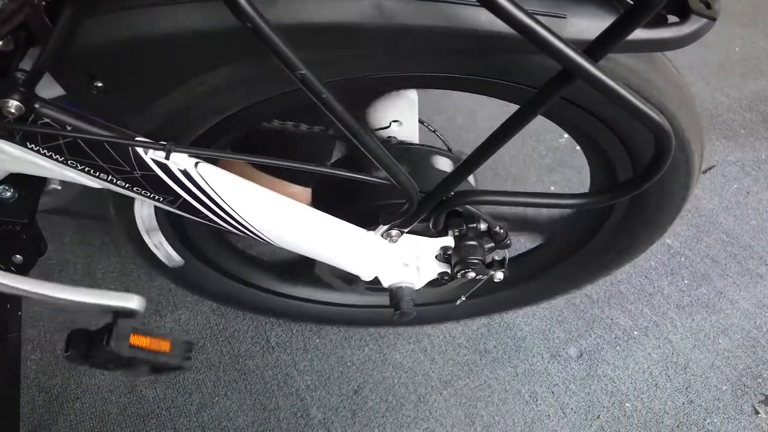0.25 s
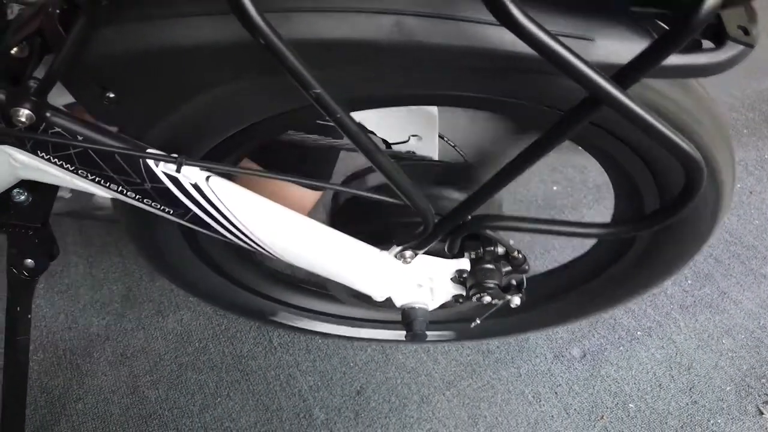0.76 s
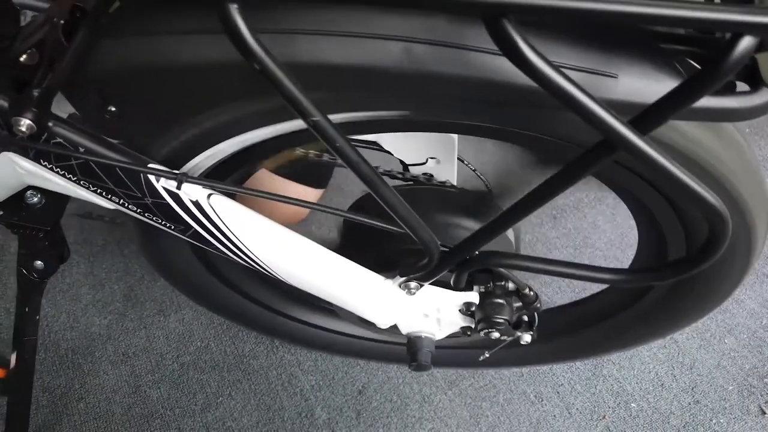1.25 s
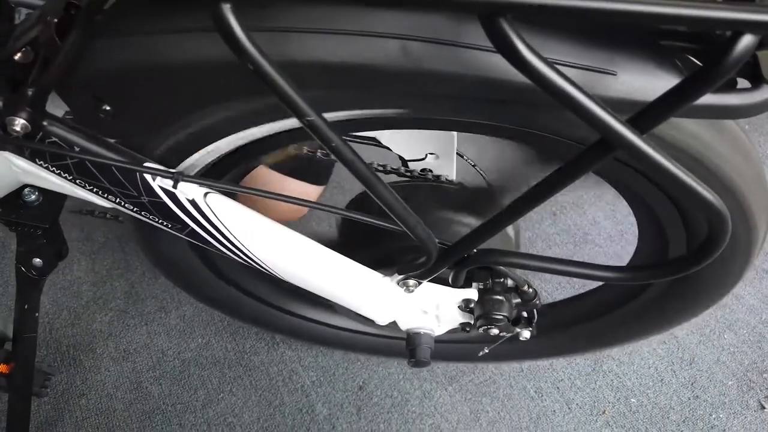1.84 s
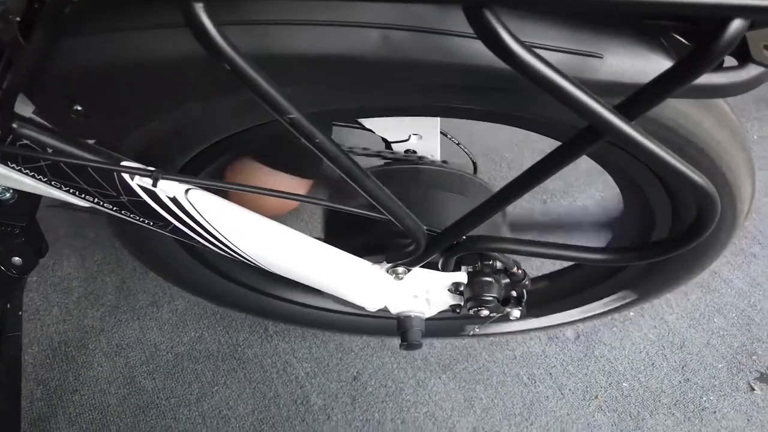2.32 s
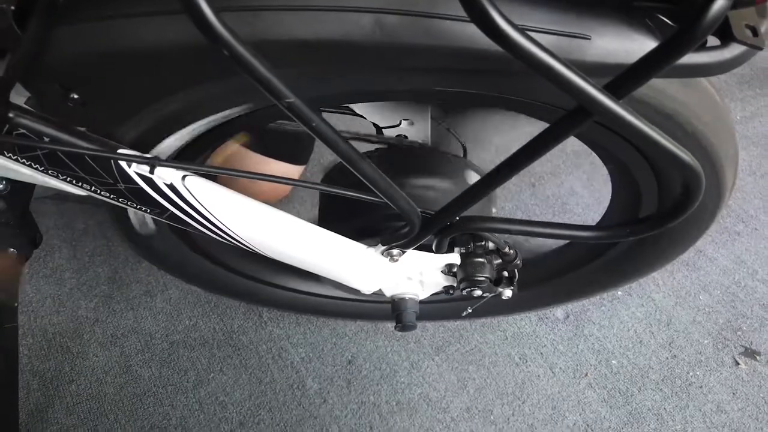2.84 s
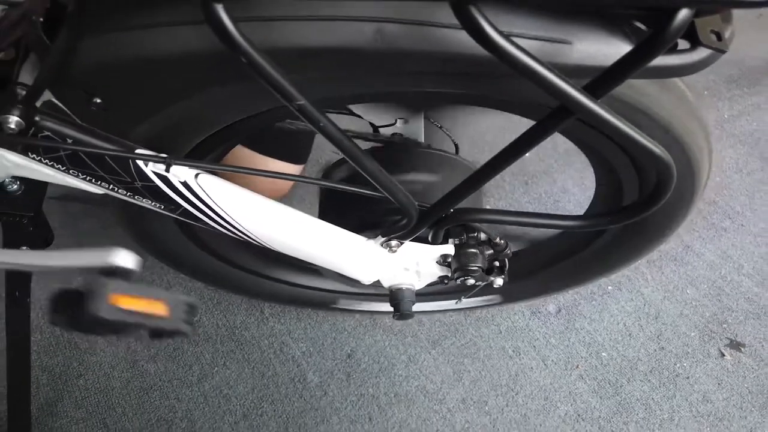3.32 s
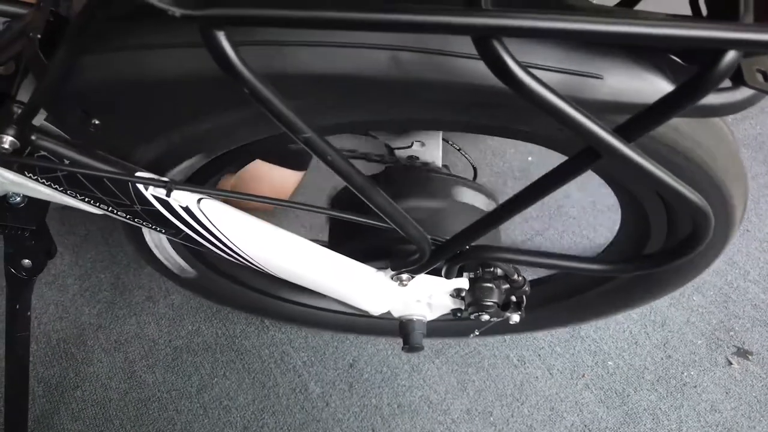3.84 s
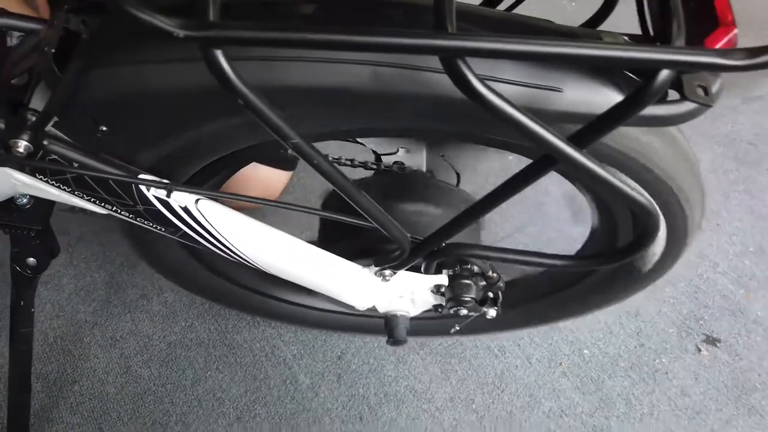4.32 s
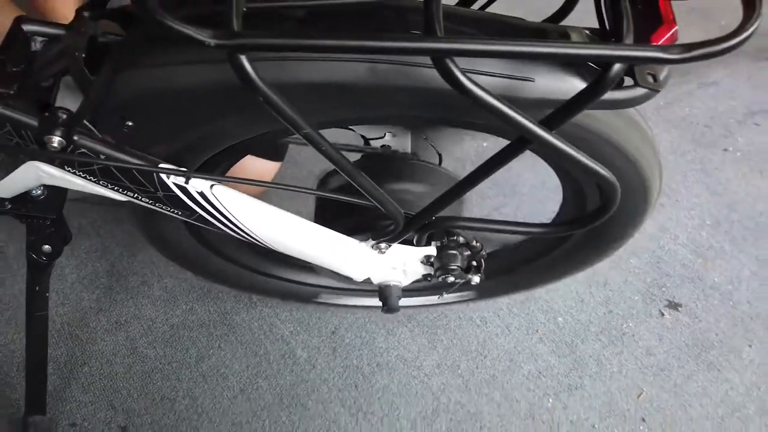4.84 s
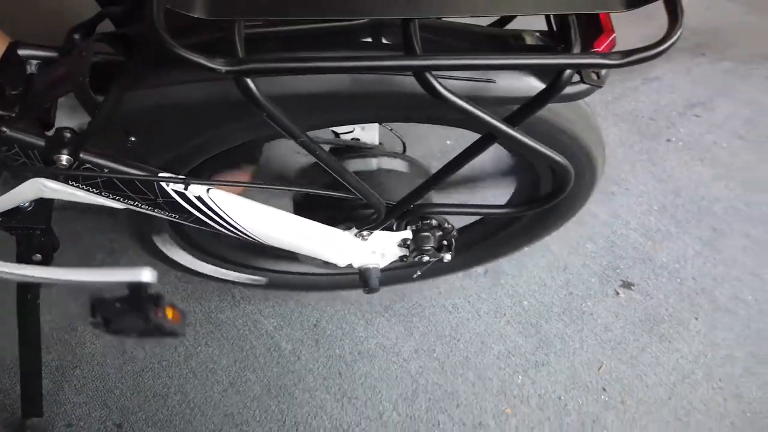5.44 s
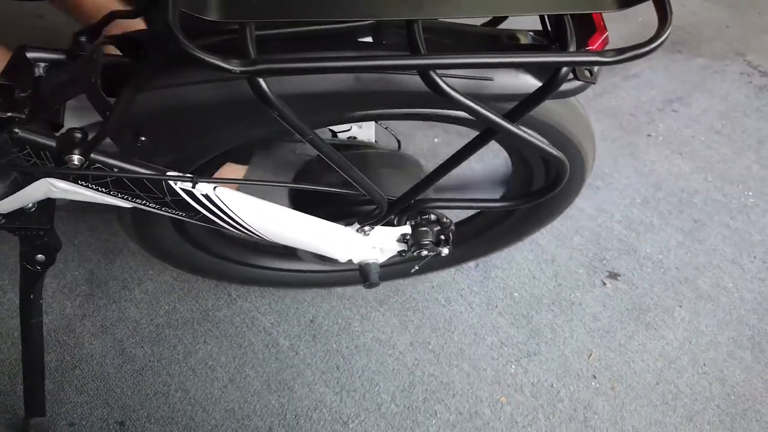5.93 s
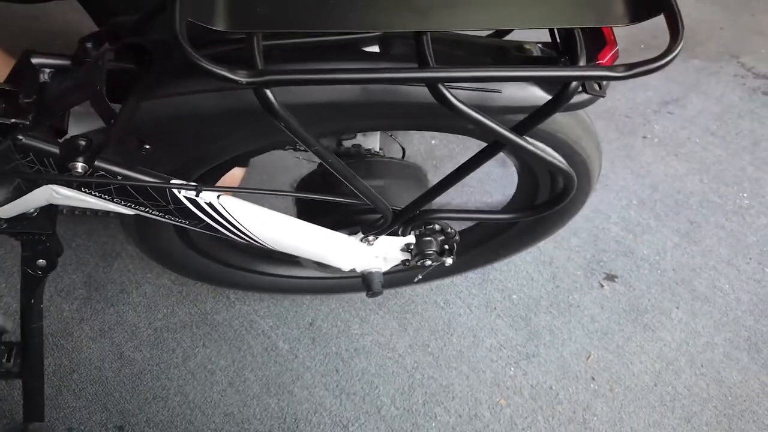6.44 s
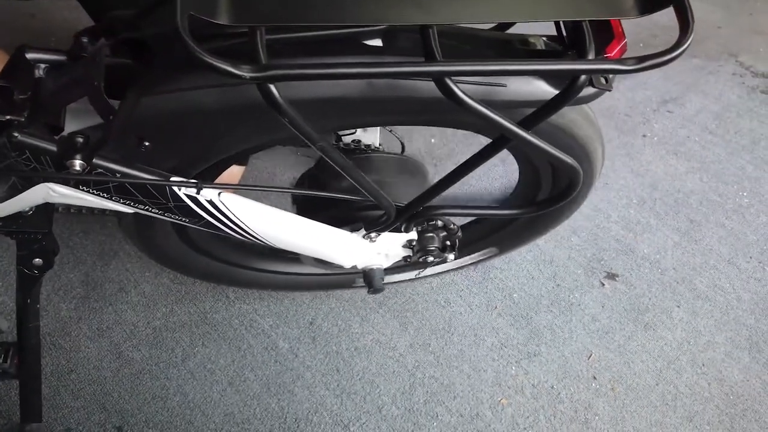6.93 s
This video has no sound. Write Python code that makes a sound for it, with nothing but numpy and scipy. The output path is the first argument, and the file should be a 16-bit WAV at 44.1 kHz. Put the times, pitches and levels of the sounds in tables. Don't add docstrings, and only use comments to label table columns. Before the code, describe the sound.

Close up on a bicycle in a hard-floored room, the hand-cranked drive begins with a small knock and a grinding whir. The freewheel then coasts with crisp metallic clicks that quicken into a buzz. Small knocks interrupt, a second faster buzz follows and ends in a loud frame-shaking clack, then after a lull the ticking returns steadily. Faint low rumble and handling bumps; phone-like sound with patchy treble.

```python
import sys
import numpy as np
from scipy import signal
from scipy.fft import rfft, irfft, next_fast_len
from scipy.io import wavfile
from scipy.ndimage import uniform_filter1d, map_coordinates

SR = 44100
rng = np.random.default_rng(int(sys.argv[2]) if len(sys.argv) > 2 else 0)


def dump_mix(stems):
    frames = np.atleast_2d(stems).T
    limited = np.clip(frames, -1, 1)
    pcm = np.round(limited * 32767).astype(np.int16)
    wavfile.write(sys.argv[1], SR, pcm)


def decibels_to_gain(level_db):
    exponent = np.asarray(level_db, float) / 20
    return 10 ** exponent


N = 316638


def unit(x):
    return x / np.sqrt(np.mean(x ** 2) + 1e-20)


def along(points, hz):
    f, v = np.transpose(points)
    return np.interp(np.log(hz + 1), np.log(f + 1), v)


def curves(rows):
    s, *cols = np.transpose(rows)
    return [np.interp(np.arange(N) / SR, s, c) for c in cols]


def wobble(rate_hz):
    knots = rng.standard_normal(int(N * rate_hz / SR) + 4)
    return map_coordinates(knots, [np.arange(N) * rate_hz / SR])


def swells(s, rise_s, fall_s, db):
    coarse = np.arange(0, N, 64)
    lag = (coarse / SR - np.reshape(s, (-1, 1))).T
    drop = np.maximum(-lag / np.clip(rise_s, .004, 3), lag / np.clip(fall_s, .004, 3))
    return np.interp(np.arange(N), coarse, decibels_to_gain(db - 20 * drop).sum(axis=1))


def below(hz, corner_hz, order):
    return 1 / (1 + (hz / corner_hz) ** order)


def above(hz, corner_hz, order):
    return 1 / (1 + (corner_hz / (hz + 1)) ** order)


def resonant(modes):
    return lambda f: sum((-1) ** k * decibels_to_gain(db) * 1j * f * w / (c * c - f * f + 1j * f * w)
                         for k, (c, w, db) in enumerate(modes))


def filtered(x, response):
    m = next_fast_len(N + 16384)
    hz, grid = np.fft.rfftfreq(m, 1 / SR), np.linspace(0, SR / 2, num=16385)
    return irfft(rfft(x, m) * np.interp(hz, grid, response(grid)), m)[..., :N]


def rung(x, response):
    passed = np.sqrt(np.mean(np.abs(response(np.linspace(0, SR / 2, num=4000))) ** 2))
    return filtered(x, response) / passed


def patchy(x, depth_db):
    z = signal.stft(x, nperseg=2048)[2]
    field = uniform_filter1d(rng.standard_normal(z.shape[1:]), size=5, axis=0)
    field = uniform_filter1d(field, size=6, axis=1)
    return signal.istft(z * decibels_to_gain(depth_db * unit(field)), nperseg=2048)[1][:, :N]


# pitch_hz, correlation (0-1)
ALIKE = [(40, .87), (200, .94), (640, .91), (1400, .91), (1850, .6), (2400, .2), (3500, .05), (8000, .2),
         (15000, .3)]


def pair(size=N):
    m = next_fast_len(size)
    turn = np.arccos(np.clip(along(ALIKE, np.fft.rfftfreq(m, 1 / SR)), -1, 1)) / 2
    spectra = rfft(rng.standard_normal((2, m))) * [np.cos(turn), np.sin(turn)]
    mid, side = irfft(spectra, m)[:, :size]
    return np.array([mid + side, mid - side])


# pitch_hz, t60_s
ROOM = [(200, 0.087), (1000, 0.12), (2500, 0.84), (3600, 0.55), (5000, 0.48), (12000, 0.42)]


def room(x, quicker):
    hz, t, z = signal.stft(pair(size=SR), SR, nperseg=256)
    decay = decibels_to_gain(-60 * quicker * t / along(ROOM, hz)[:, None])
    tail = signal.istft(z * decay, SR, nperseg=256)[1]
    return signal.fftconvolve(x, tail / np.linalg.norm(tail[0]), axes=1)[:, :N]


# pitch_hz, level_db (per Hz)
BUILDING = [(11, -33.5), (28, -9.5), (44, -4.5), (82, -17.5), (187, -30), (237, -19.5), (529, -27),
            (1290, -49.5), (1630, -41), (2360, -27), (3200, -76.5), (4160, -113), (7040, -120)]
# peak_s, rise_s, fall_s (per 20 dB), deep_db, hum_db
BUMPS = [(0.0, 0.092, 0.14, -43.5, -106), (0.3, 0.22, 0, -72, -71), (0.92, 0.6, 0.4, -54.5, -68),
         (1.19, 0.05, -0.4, -56, -61), (1.4, 0.35, 0.5, -56, -64.5), (3.4, 0.51, .5, -56.5, -76),
         (3.72, 0.12, 0.16, -60, -65), (4.15, 0.12, 0.33, -46.5, -94), (4.36, 0.63, -0.64, -48, -71.5),
         (2.3, 1, 0.5, -60.5, -84.5), (5.3, 0.079, -0.16, -68, -59), (5.48, 0.22, 1, -46.5, -69.5),
         (6.12, 0.39, 0, -59, -80), (6.5, 0.18, .5, -57.5, -75)]


def rumble():
    steady_deep_db, steady_hum_db, hiss_db = -63, -81.5, -77.5
    s, rise_s, fall_s, deep_db, hum_db = np.transpose(BUMPS)
    air = filtered(pair(), lambda hz: decibels_to_gain(along(BUILDING, hz)))
    deep = filtered(air, lambda hz: below(hz, 100, 6))
    swell = filtered(deep, lambda hz: above(hz, 26, 4))
    hiss = filtered(air, lambda hz: above(hz, 230, 6))
    thud = (decibels_to_gain(steady_deep_db) + swells(s, rise_s, fall_s, deep_db)) * decibels_to_gain(0.55 * wobble(3.0))
    hum = decibels_to_gain(steady_hum_db) + swells(s, rise_s, fall_s, hum_db + 3.5)
    return thud * unit(swell) + hum * unit(air - deep - hiss) + decibels_to_gain(hiss_db) * unit(hiss)


# start_s, peak_db, low_part_db, high_part_db, t60_s of the rattle
KNOCKS = [(0.0014, -38, -18, -5.5, 0.09), (0.795, -42, 1.5, -35, 0.41), (1.3866, -32.5, 6, 3.5, 0.1),
          (1.4488, -25.5, 2.5, -18, 0.027), (3.32, -28, -1.5, -48, 0.056), (3.337, -40.5, 15, -18, 0.089),
          (3.882, -45.5, -16, -48, 0.1), (4.041, -39.5, -0.5, -36, 0.56), (4.096, -32, -44, -26, 0.02),
          (4.394, -26, -10, -6.5, 0.0095), (5.3006, -26, -8, 7.5, 0.1), (5.323, -36.5, -1, -14, 0.11),
          (5.3508, -35, 5, -1.5, 0.1), (5.485, -13, -22, -12.5, 0.061), (5.4923, -7, -11.5, -14.5, 0.047),
          (5.509, -24, -7.5, -26, 0.024), (5.5196, -24.5, -3.5, -23.5, 0.29),
          (6.298, -19.5, -1.5, -7.5, 0.092), (6.309, -38, 8, -18, 0.76)]
# pitch_hz, width_hz, level_db
FRAME = [
    [(197, 110, -8), (330, 280, -4), (490, 227, -1), (702, 31, 3), (885, 420, -5)],
    [(1270, 97, -0.5), (1737, 162, 6.5), (1883, 545, 1.5), (2415, 210, -0.5)],
    [(2900, 450, 6.5), (3600, 100, 7), (3730, 410, -3.5), (4550, 280, -10), (5800, 200, -28)],
]
# start_s, peak_db, pitch_hz, t60_s
PINGS = [(0.7955, -36, 1300, 0.024), (3.2849, -44.5, 2210, 0.16), (3.375, -42, 2050, 0.071),
         (3.6672, -61, 2260, 0.1), (3.7237, -59.5, 1340, 0.15), (3.76, -55, 1280, 0.073),
         (3.8097, -65, 1485, 0.15), (3.85, -51.5, 1275, 0.13), (3.9024, -52, 1015, 0.099),
         (3.985, -42.5, 1780, 0.069), (6.2652, -42, 2363, 1), (6.288, -77, 1720, 0.048),
         (1.449, -30, 1320, 0.027), (1.4495, -32, 2600, 0.027), (4.393, -27, 2480, 0.025),
         (4.099, -32.5, 2290, 0.035)]
# start_s, peak_db, pitch_hz, t60_s
MORE_PINGS = [(3.3215, -35.5, 2227, 0.075), (3.324, -33, 1805, 0.1), (6.31, -44, 717, 0.62),
              (5.3005, -26, 3600, 0.022), (5.303, -24.5, 1577, 0.088), (5.335, -37, 330, 0.26),
              (5.361, -35.5, 238, 0.082), (5.488, -28.5, 4060, 0.082), (5.493, -21.5, 945, 0.2),
              (5.494, -18, 1872, 0.14), (3.325, -34, 490, 0.11)]


def knocks():
    room_db = -3.5
    near, far, t = np.zeros((2, N + SR)), np.zeros((2, N + SR)), np.arange(SR // 3) / SR
    hz = np.fft.rfftfreq(2 * len(t), 1 / SR)
    parts = np.array([resonant(modes)(hz) * below(hz, 1.3 * modes[-1][0], 6) for modes in FRAME])
    parts = parts / np.sqrt(np.mean(np.abs(parts) ** 2, axis=1, keepdims=True))
    shake = pair()
    for s, db, low_db, high_db, t60 in KNOCKS:
        at = round(s * SR)
        envelope = decibels_to_gain(-60 * t / np.clip(t60, .01, 1)) * (1 - np.exp(-t / 0.0012))
        rattle = shake[:, at:at + len(t)] * envelope
        body = decibels_to_gain(db - 8.0 + np.array([low_db, 0, high_db])) @ parts
        blow = irfft(rfft(rattle, 2 * len(t)) * body)
        near[:, at:at + 2 * len(t)] += blow
        far[:, at:at + 2 * len(t)] += decibels_to_gain(room_db) * blow
    for s, db, pitch_hz, t60 in list(PINGS) + list(MORE_PINGS):
        drift = np.cumsum(rng.standard_normal(len(t)))
        flutter = 0.093 * signal.lfilter(*signal.butter(4, 1 / 40), drift)
        ring = np.sin(2 * np.pi * pitch_hz * t + flutter) * (1 - np.exp(-t / 0.0013))
        near[:, round(s * SR):][:, :len(t)] += decibels_to_gain(db - 60 * t / np.clip(t60, .01, 1)) * ring
    return near[:, :N] + room(far[:, :N], quicker=0.75)


# time_s, load_db, slackness_db
DRIVE = [(0.0, -36, -9.5), (0.3, -53.5, -2.5), (0.56, -61, -1.5), (0.82, -48.5, -9), (1.14, -46.5, -6),
         (1.58, -43.5, -7.5), (1.94, -45.5, -10.5), (2.7, -49, -12), (3.1, -57, -13), (3.54, -77.5, -0.5),
         (3.78, -69, -9.5), (4.08, -102, -3), (4.62, -64, -11), (5.36, -70, -3.5), (5.56, -81, -8),
         (6.1, -70.5, -10.5), (6.7, -68, -1), (7.18, -76, 1.5)]
# pitch_hz, width_hz, level_db
WHINE = [(1036, 150, -2.5), (1320, 104, 1.5), (1475, 72, -2), (1663, 67, -2.5), (2210, 250, -12.5),
         (2946, 490, -16.5)]
# pitch_hz, width_hz, level_db
GROWL = [
    (628, 117, -1.5),
    (793, 120, 3.5),
    (890, 214, 0),
]
# pitch_hz, width_hz, level_db
DRONE = [(245.7, 24, -5.5), (311, 23, -9.5), (476, 68, 3)]
# peak_s, rise_s, fall_s (per 20 dB), level_db
DRONES = [
    (3.72, 0.16, 7, -79),
    (4.231, 0.21, 0.5, -62.5),
    (5.55, 0.026, 0.36, -64.5),
    (6.463, .13, -1.5, -67),
    (6.62, 0.55, 0.16, -59),
]
# peak_s, rise_s, fall_s (per 20 dB), growl_db, whine_db
SHUDDERS = [(0.02, 0.056, 0.55, -54.5, -53), (0.8, .01, 3, -56.5, -55.5), (1.16, 0.2, 1.2, -56, -58.5),
            (2.42, 0.19, 0.25, -77, -63), (0.55, 0.13, 0.5, -70, -65.5), (0.7, 0.046, -1.5, -76, -65),
            (0.9, 0.23, -2.3, -69, -55), (1.05, 0.12, 3.5, -65.5, -61), (4.231, 0.21, 1, -57.5, -59),
            (5.58, 0.041, 0.5, -49, -62.5), (5.75, .2, 2, -65.5, -74), (6.462, 0.11, 4, -67, -70),
            (6.6, 0.28, -0.44, -53, -76)]
# pitch_hz, width_hz, level_db
GEARS = [(1310, 61, 1.5), (2300, 90, -6.5)]
# peak_s, rise_s, fall_s (per 20 dB), level_db
GEARS_SING = [
    (0.72, 0.17, 3, -57.5),
    (1.12, 1.02, 0, -50.5),
]
# pitch_hz, level_db (per Hz)
LINKS = [(2120, -58), (3600, -44.5), (3900, -31), (4070, -6.5), (4250, -27), (4610, -53), (7950, -46.5),
         (8670, -7.5), (9340, -15.5), (10800, 7), (11600, -4), (12600, -37.5), (13800, -17), (15800, -20.5)]
# peak_s, rise_s, fall_s (per 20 dB), level_db
FIZZ = [
    (0.0, 0.012, -0.14, -65),
    (.45, .08, -0.9, -86),
    (.62, 0.044, -0.2, -85.5),
    (0.852, 0.34, -2.2, -76),
    (0.92, 0.071, 0.5, -62.5),
    (1.004, 0.023, 1.5, -74),
    (3.68, .4, -0.5, -99.5),
    (3.9, 0.37, 0.5, -93),
    (5.84, .8, 0.5, -88.5),
]


def drive(grit_db=0.5, throb_db=2.34):
    drone_db, drone_follows = -2, 2.12
    load_db, slack_db = curves(DRIVE)
    s, rise_s, fall_s, growl_db, whine_db = np.transpose(SHUDDERS)
    grain = pair()
    rub = patchy(grain * decibels_to_gain(grit_db * wobble(150) + throb_db * wobble(12)), depth_db=3.0)

    gears = unit(filtered(grain, lambda hz: resonant(GEARS)(hz) ** 2))
    gears = gears * swells(*np.transpose(GEARS_SING))

    whine = unit(filtered(rub, lambda hz: resonant(WHINE)(hz) * below(hz, 3000, 6) * above(hz, 990, 12)))
    whine = whine * (decibels_to_gain(load_db - 5.0) + swells(s, rise_s, fall_s, whine_db))

    growl = unit(filtered(rub, lambda hz: resonant(GROWL)(hz) * below(hz, 1100, 6) * above(hz, 560, 6)))
    steady = filtered(growl, lambda hz: below(hz, 850, 16))
    growl = steady * decibels_to_gain(load_db + slack_db - 1.0) + growl * swells(s, rise_s, fall_s, growl_db)

    drone = unit(filtered(rub, lambda hz: resonant(DRONE)(hz) * below(hz, 620, 6) * above(hz, 200, 6)))
    steady_db = load_db + drone_follows * slack_db + drone_db + 6.0
    drone = drone * (decibels_to_gain(steady_db) + swells(*np.transpose(DRONES)))

    fizz = unit(filtered(patchy(pair(), depth_db=9.0), lambda hz: decibels_to_gain(along(LINKS, hz))))
    fizz = decibels_to_gain(4.0) * swells(*np.transpose(FIZZ)) * fizz
    return gears + whine + growl + drone + fizz


# start_s, peak_db, pitch_hz
SNAPS = [
    [(1.2027, -35, 1420), (1.2321, -26, 1330), (1.2566, -28, 2320), (1.2795, -32, 2350), (1.304, -32, 1270),
     (1.3609, -35, 1010), (1.3788, -24, 1220), (1.4477, -26, 1445), (1.505, -32, 1270), (1.5983, -53, 1260),
     (1.6562, -40, 2590), (1.6856, -30, 2620), (1.716, -33, 2580), (1.732, -32, 2530), (1.8083, -35, 1310),
     (1.9031, -32, 1310), (1.963, -27, 2210), (1.9779, -29, 1300), (2.1042, -32, 2700), (2.1201, -37, 2700),
     (2.1675, -31, 2470), (2.3022, -26.5, 2410), (2.389, -29.5, 1630), (2.4339, -38, 2640),
     (2.4943, -22, 2370), (2.6215, -25, 2230), (2.7936, -37, 2330), (2.8719, -30, 2290),
     (2.9128, -26, 2380), (2.9353, -34, 2400), (2.9762, -35, 2300), (3.1363, -33, 2300)],
    [(4.0803, -39, 1760), (4.0988, -48, 2190), (4.1167, -28, 2430), (4.1457, -28, 1830),
     (4.2444, -36, 2270), (4.3921, -31, 2300), (4.4075, -27, 2330), (4.4525, -30, 2270),
     (4.4675, -32, 2300), (4.5253, -38, 2210), (4.5517, -35, 2280), (4.6854, -30, 2220),
     (4.7024, -33, 2190), (4.7348, -31, 2300), (4.7715, -30, 2300), (4.8426, -34, 2280),
     (4.8895, -28, 2230), (5.0616, -26.5, 2300), (5.109, -32, 2420)],
    [(6.4281, -25.5, 2640), (6.481, -33, 2740), (6.5069, -37, 2390), (6.5488, -43, 2500),
     (6.5638, -26, 1980), (6.6331, -31, 2370), (6.7599, -39, 2620), (6.8447, -28, 2030),
     (6.9165, -30, 2420), (6.9444, -46, 2520), (7.0602, -49, 2680), (7.1225, -39, 2300)],
]


def snaps():
    t60_s, mode_db, sprocket_hz, sprocket_db = 0.025, -1, 4000, -15
    out, t = np.zeros((2, N + SR)), np.arange(SR // 20) / SR
    for s, db, pitch_hz in np.concatenate(SNAPS):
        for hz, level_db in (pitch_hz, mode_db), (sprocket_hz, sprocket_db):
            turn = np.arccos(along(ALIKE, hz)) / 2
            ring = np.sin(2 * np.pi * hz * t + [[turn], [-turn]]) / np.cos(turn)
            ring = ring * (1 - np.exp(-t / 0.00183))
            out[:, round(s * SR):][:, :len(t)] += decibels_to_gain(db + level_db - 60 * t / t60_s) * ring
    return out[:, :N]


# time_s, rate_hz (clicks per second)
RATCHET = [
    [(1.17, 26.6), (1.25, 41.1), (1.47, 67.2), (2.18, 62.4), (2.45, 113), (2.9, 140), (3.0, 133),
     (3.13, 98), (3.3, 8)],
    [(3.98, 25.5), (4.1, 59.3), (4.22, 73.8), (4.45, 63.1), (4.75, 128), (4.88, 153.8), (5.15, 135.8),
     (5.35, 85.6), (5.47, 24.3)],
    [(6.18, 37.2), (6.26, 39.5), (6.35, 77.9), (6.5, 72.6), (6.8, 70.2), (7.18, 67.8)],
]
TOOTH_START = [
    .97,
    .9,
    .64,
]
# start_s, level_db (over an ordinary click)
ACCENTS = [(1.2044, 7), (1.2309, 5.5), (1.2559, 9.5), (1.282, 1), (1.3027, 7.5), (1.379, 5), (1.3982, 5.5),
           (1.4142, 2.5), (1.4313, 5.5), (1.4484, 2), (1.508, 8), (1.582, 3), (1.5945, 5.5), (1.6877, 9.5),
           (1.7029, 4.5), (1.7173, 7.5), (1.7317, 4.5), (1.8247, 3.8), (1.8401, 4.5), (1.8705, 8.5),
           (1.9809, 6.5), (1.995, 8.5), (2.0092, 6), (2.0277, 5), (2.107, 6), (2.1226, 2), (2.184, 6),
           (2.3025, 5), (2.3253, 5), (2.497, 1.5), (2.5051, 3), (2.6219, 10.5), (2.632, 1.5), (2.6516, 6.5),
           (3.0388, 4.5), (3.1516, 2.5), (4.116, 6), (4.1467, 7.5), (4.2467, 8), (4.2582, 12),
           (4.2725, -5.5), (4.4365, 2), (4.455, 8.5), (4.54, 1), (4.5535, 11), (4.577, 0), (4.7717, 9.5),
           (5.0612, 0), (6.387, 7.5), (6.4009, 1.5), (6.6453, 6.5), (6.662, 3), (6.7458, 1.5),
           (6.8027, 1.5), (6.9193, 4), (6.9305, 2), (6.9435, 9), (6.9601, 4), (7.15, 6.5), (7.1651, 1.5)]


def pawl_bursts(scatter_db=0.84, rise_s=0.0017, fall_s=0.0013, wet_db=2):
    snap_burst_db = 2
    drops, t = np.zeros(N), np.arange(N) / SR
    for rows, start, hard in zip(RATCHET, TOOTH_START, SNAPS):
        s, rate = np.transpose(rows)
        rate = np.interp(t, s, rate, 0, 0)
        at = np.flatnonzero(np.diff(np.floor(start + np.cumsum(rate) / SR)))
        luck = rng.standard_normal((len(at), 2))
        exact = np.round((np.transpose(hard)[0] + rise_s / 2) * SR).astype(int)
        nearest = np.abs(at[:, None] - exact).argmin(axis=0)
        at[nearest], luck[nearest] = exact, (0, snap_burst_db / scatter_db)
        for when_s, db in ACCENTS:
            if s[0] < when_s < s[-1]:
                tooth = np.abs(at - when_s * SR).argmin()
                at[tooth], luck[tooth] = when_s * SR, (0, 0.78 * db / scatter_db)
        force = decibels_to_gain(scatter_db * luck[:, 1]) / np.sqrt(np.maximum(rate[at], 45))
        jittered = at + (15 * luck[:, 0]).astype(int)
        drops[np.minimum(jittered, N - 1)] = force
    lag = np.linspace(-1, 1, num=SR // 25 + 1) / 50
    shape = np.exp(np.minimum(lag / rise_s, -lag / fall_s))
    bursts = unit(signal.fftconvolve(drops, shape, "same") * pair())
    clear = (80 / np.maximum(curves(np.concatenate(RATCHET))[0], 40)) ** 0.17
    return unit(patchy(clear * bursts + decibels_to_gain(wet_db) * room(bursts, quicker=0.75), depth_db=2.4))


# time_s, tick_db
PAWLS = [
    [(1.15, -60), (1.21, -52.5), (1.47, -46), (2.16, -48.5), (2.45, -44), (2.97, -44.5), (3.2, -52.5),
     (3.29, -70.5), (3.42, -100)],
    [(3.976, -97), (3.983, -74), (4.08, -59.5), (4.28, -48), (4.386, -51.5), (4.78, -42), (5.272, -43.5),
     (5.396, -52.5), (5.56, -82)],
    [(6.17, -100), (6.184, -79), (6.236, -74.5), (6.292, -56.5), (6.364, -47.5), (6.912, -47), (7.18, -49)],
]
# pitch_hz, width_hz, level_db
TICK = [(5720, 186, 6.5), (7280, 360, -8), (8177, 345, 1), (8980, 220, 0), (9790, 500, -1.5),
        (10960, 650, 2), (11928, 400, 7.5), (12150, 520, 5), (13100, 150, -29), (13000, 1200, -10),
        (15800, 900, 0)]
# pitch_hz, width_hz, level_db
SPROCKET = [(3126, 286, -1.5), (3460, 560, -7), (3964, 243, -5), (4496, 65, -0.5)]
# pitch_hz, width_hz, level_db
SHELL = [(1780, 116, 3), (2028, 69, 2.5), (2132, 185, 3.5), (2574, 500, 4), (2910, 280, -0.5)]
# pitch_hz, width_hz, level_db
HUB = [(2254, 42, 7), (2620, 210, -20.5)]
# peak_s, rise_s, fall_s (per 20 dB), level_db (over the steady ring)
SURGES = [(1.3, 0.18, -1.7, -5.5), (2.514, 0.11, -0.5, 11.5), (2.64, 0.16, -3.5, -3),
          (2.82, 0.055, 0.09, 14.5), (2.94, 0.03, -7, -14), (3.142, 0.0143, 0, 9), (4.05, 0.0078, -0.8, -7),
          (4.11, 0.033, 0.18, 9), (4.411, 0.031, 0.2, 6), (4.713, 0.036, 0.1, 5.5), (4.78, 0.09, 0.1, 4.5),
          (4.916, 0.13, 0, -1), (5.044, 0.12, 5, -0.5), (6.635, 0.04, -0.5, 7.5), (6.854, 0.055, -1.3, -3)]
# pitch_hz, width_hz, level_db
RIM = [(1670, 67, 1), (1248, 120, -2)]
# peak_s, rise_s, fall_s (per 20 dB), level_db
RIM_SINGS = [
    (2.1, .6, 1.1, -57),
    (2.45, .3, 0.83, -46.5),
    (2.98, 0.14, -1.07, -63),
    (3.18, 0.071, -3.4, -61),
]


def freewheel():
    bursts = pawl_bursts()
    tick_db, = curves(np.concatenate(PAWLS))

    bright = lambda hz: resonant(TICK)(hz) * above(hz, 4800, 8)
    tick = rung(decibels_to_gain(tick_db + 1.5) * bursts, bright)

    first_db, later_db, settle_s = -6, -9.5, 0.42
    starts = np.array([0] + [rows[0][0] for rows in RATCHET])
    t = np.arange(N) / SR
    since_s = t - starts[np.searchsorted(starts, t, 'right') - 1]
    sprocket_db = later_db + (first_db - later_db) * np.exp(-since_s / settle_s)
    steely = lambda hz: resonant(SPROCKET)(hz) * above(hz, 3000, 8) * below(hz, 4900, 12)
    sprocket = rung(decibels_to_gain(tick_db + sprocket_db) * bursts, steely)

    shell_db, full_tick_db, follows, hub_db = -46, -44, 0.61, -5.5
    level = decibels_to_gain(shell_db + follows * (tick_db - full_tick_db))
    surge = swells(*np.transpose(SURGES))
    hollow = lambda hz: resonant(SHELL)(hz) * above(hz, 1650, 12) * below(hz, 3300, 8)
    shell = rung(level * (1 + 0.47 * surge) * bursts, hollow)
    singing = lambda hz: resonant(HUB)(hz) * above(hz, 1900, 8) * below(hz, 3000, 8)
    hub = rung(decibels_to_gain(hub_db) * level * surge * bursts, singing)

    wheel_db = -9.5
    spokes = lambda hz: resonant(WHINE[:4])(hz) * below(hz, 1900, 6) * above(hz, 990, 12)
    wheel = rung(decibels_to_gain(curves(DRIVE)[0] + wheel_db) * bursts, spokes)
    rim = rung(swells(*np.transpose(RIM_SINGS)) * bursts, lambda hz: resonant(RIM)(hz) ** 2)
    return rim + tick + sprocket + wheel + hub + shell


def scene():
    return rumble() + knocks() + drive() + snaps() + freewheel()


# pitch_hz, level_db (per Hz)
FAINT_HISS = [(1760, -56), (3000, -12), (4310, -14), (4880, -17.5), (5610, -13.5), (9450, -22.5),
              (10900, -17.5), (12500, -28.5), (15800, -29.5)]


def faint_hiss():
    hiss = filtered(pair(), lambda hz: decibels_to_gain(along(FAINT_HISS, hz)))
    return decibels_to_gain(-96.0) * unit(patchy(hiss, depth_db=5.0))


# pitch_hz, level_db (per bin)
NOISE_GUESS = [(130, -120), (240, -88), (420, -120), (1800, -104), (2600, -92.5), (3300, -87), (3750, -82),
               (4070, -106), (4450, -100), (5800, -108.5), (8500, -104), (10500, -105), (15000, -104)]
# low_hz, high_hz
DISTRUST = [
    (3080, 3860),
    (4280, 5560),
    (6020, 7950),
    (9170, 9540),
    (12400, 13900),
]
# level_db (per bin, in the three buzzes), growth_db (per s),
# fresh_db (lower as a buzz starts), lost_db (per s after a buzz)
LEARNING = [
    ((-81.5, -79.5, -79), 10, 25, 410),
    ((-66.5, -71, -71), 0.033, 0.033, 80),
    ((-69, -71, -65.5), -2.5, 30, 0.096),
    ((-76, -83.5, -76), 5.1, 19, .1),
    ((-65.5, -62, -68), 0.33, 36, .1),
]


def suppressor(dry):
    hz, t, z = signal.stft(dry, SR, nperseg=1024)
    power = uniform_filter1d(np.mean(np.abs(z) ** 2, 0), size=7, axis=0)
    power = uniform_filter1d(power, size=5, axis=1)

    wary_db, wary_mid_db, wary_s = 3.5, 8.5, 0.7
    first_db = wary_db + wary_mid_db * ((hz > 1760) & (hz < 3200))
    guess_db = along(NOISE_GUESS, hz)[:, None] + first_db[:, None] * below(t, wary_s, 12)
    steep = np.where(hz < 2450, 0.55, 1.1)[:, None]

    fresh_s, edge_db = 0.086, 5
    starts, ends = np.transpose([(0.011, 0)] + [(rows[0][0], rows[-1][0]) for rows in RATCHET])
    latest = np.searchsorted(starts, t, 'right') - 1
    since_s, after_s = t - starts[latest], np.maximum(t - ends[latest], 0)
    for (low_hz, high_hz), (db, growth_db, fresh_db, lost_db) in zip(DISTRUST, LEARNING):
        band = (hz > low_hz) & (hz < high_hz)
        doubt_db = np.take(db, np.maximum(latest - 1, 0)) + growth_db * since_s - lost_db * after_s
        doubt_db = doubt_db - (latest > 1) * fresh_db / (1 + (since_s / fresh_s) ** 8)
        place = 2 * (hz[band, None] - low_hz) / (high_hz - low_hz) - 1
        doubt_db = doubt_db - edge_db * place ** 4
        guess_db[band], steep[band] = np.maximum(guess_db[band], doubt_db), 12

    waver = rng.standard_normal((len(hz) // 8 + 1, len(t)))
    waver = unit(uniform_filter1d(waver, size=7, axis=1))[np.arange(len(hz)) // 8]
    waver_db = np.where((hz > 3200) | (hz < 400), 4, 1)[:, None] * waver
    ratio = (np.abs(power) / decibels_to_gain(guess_db + waver_db) ** 2) ** steep
    keep = np.maximum(ratio / (1 + ratio), decibels_to_gain(-45)) * (hz < 15800)[:, None]
    return signal.istft(z * keep, SR, nperseg=1024)[1][:, :N]


def top_cut(x):
    return signal.sosfilt(signal.butter(12, 16940, fs=SR, output="sos"), x)


def record(dry):
    mix = suppressor(dry) + faint_hiss()
    return top_cut(mix)


dry = scene()
out = record(dry)
dump_mix(out)
```